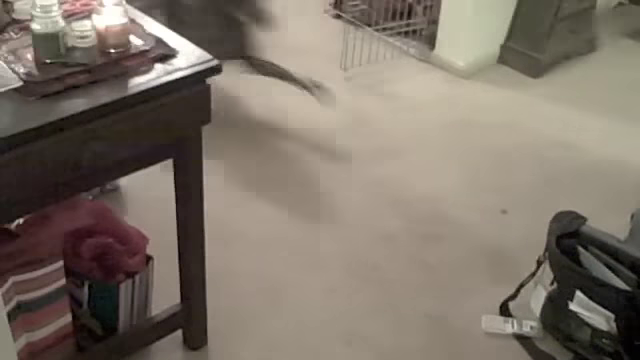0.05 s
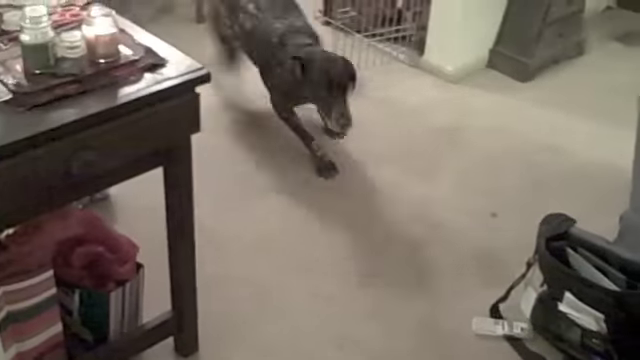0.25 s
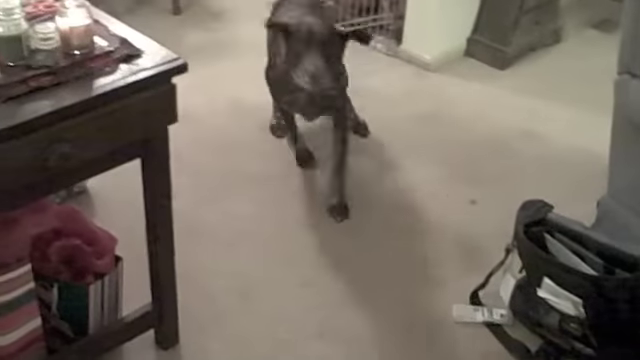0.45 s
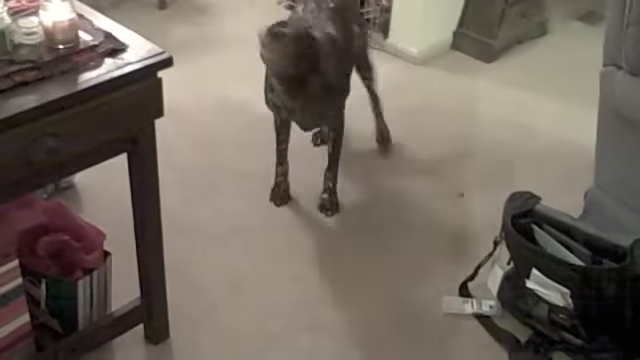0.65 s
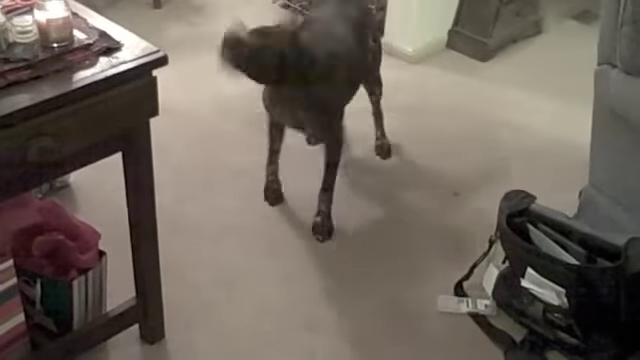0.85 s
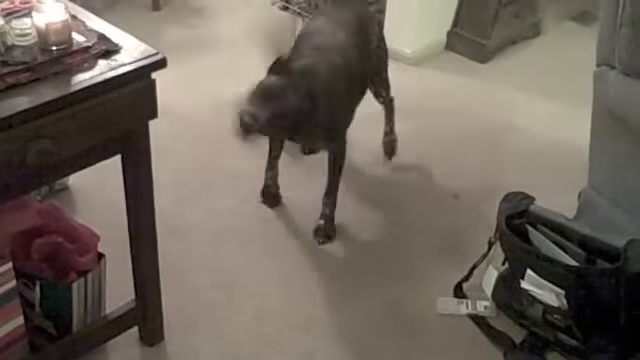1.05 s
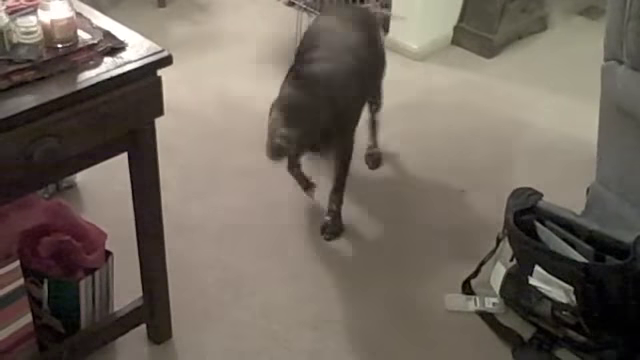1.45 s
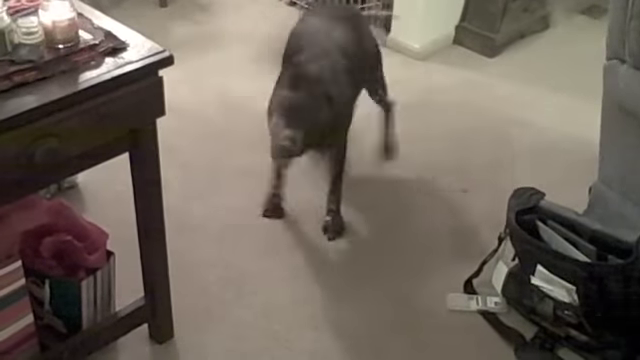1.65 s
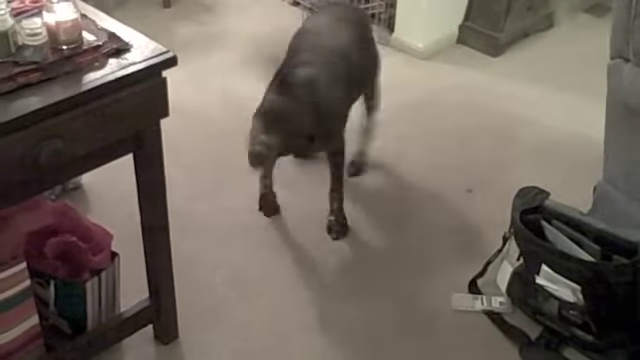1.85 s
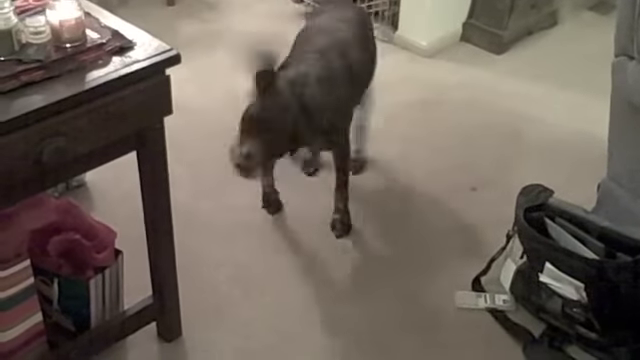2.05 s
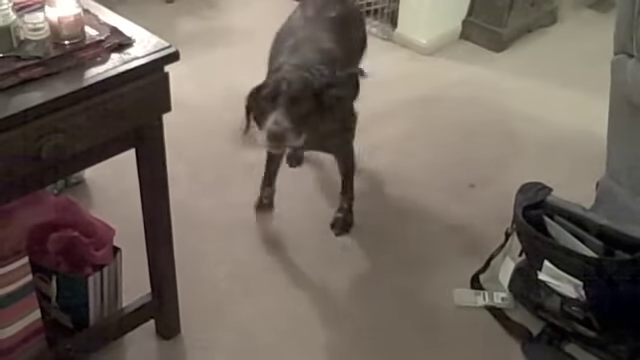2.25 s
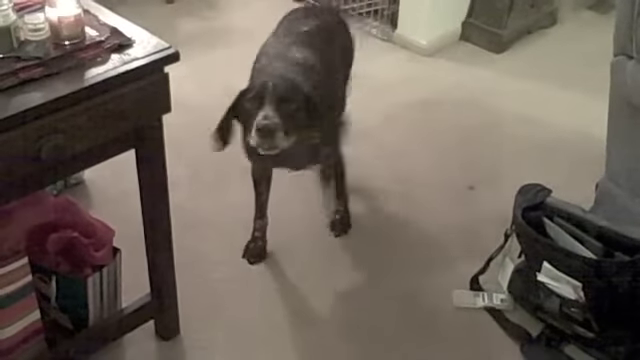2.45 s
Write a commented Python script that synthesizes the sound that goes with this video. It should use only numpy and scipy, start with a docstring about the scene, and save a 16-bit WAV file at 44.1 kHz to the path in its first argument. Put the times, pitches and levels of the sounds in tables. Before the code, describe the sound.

A dog shakes its head indoors, ears slapping rapidly, with paw thuds on carpet.

```python
"""A living room: a dog trots onto the carpet, stops close by and shakes its head.
Its ears slap about ten times a second, each slap a crack, a second contact of the tip, a patter of
skin and fur and a hollow pop of trapped air. Paws thud on the carpeted floor, claws or collar tick,
the coat rustles, and the room rings briefly over a low rumble."""
import sys
import numpy as np
from scipy import signal
from scipy.fft import rfft, irfft, next_fast_len
from scipy.io import wavfile

SR = 44100
rng = np.random.default_rng(int(sys.argv[2]) if len(sys.argv) > 2 else 0)


def wrap_up_sound(samples):
    """Save the sound to the file named by the first command line argument, as 16-bit audio."""
    columns = np.atleast_2d(samples).T
    # keep every value between -1 and 1, then stretch to whole-number steps
    tamed = np.clip(columns, -1, 1)
    steps = np.round(tamed * 32767).astype(np.int16)
    wavfile.write(sys.argv[1], SR, steps)


N = 110250


def amp(db):
    """Decibels to gain."""
    return 10 ** (np.asarray(db) / 20)


def unit(x):
    """Scales a sound to an energy of 1."""
    return x / np.sqrt(np.sum(x ** 2) + 1e-20)


def read(points, hz):
    """Reads a curve on a log-frequency axis."""
    point_hz, value = np.transpose(points)
    return np.interp(np.log(hz + 1), np.log(point_hz + 1), value)


def add(mix, start_s, sound):
    """Drops a sound into the mix."""
    part = mix[max(round(start_s * SR), 0):][:len(sound)]
    part += sound[:len(part)]


def tight_pulse(db_at, size=2048):
    """The tightest causal (minimum-phase) pulse with the given spectrum."""
    hz = abs(np.fft.fftfreq(size, 1 / SR))
    log_gain = np.log(amp(np.maximum(db_at(hz), -90)))
    spectrum = np.exp(np.conj(signal.hilbert(log_gain)))
    return unit(np.fft.ifft(spectrum).real[:size // 2])


def colour(x, eq):
    """Shapes a sound with an EQ curve."""
    return signal.fftconvolve(x, tight_pulse(lambda hz: read(eq, hz), size=4096))[:len(x)]


def grains(size, spread_db):
    """Noise made of tiny contacts of uneven strength."""
    return rng.standard_normal(size) * amp(spread_db * np.minimum(rng.exponential(1, size), 4))


def swell(t, rise_s, fall_s):
    """Exponential rise up to time zero and fall after it."""
    return np.exp(np.minimum(t / rise_s, -t / fall_s))


def bed(eq, fader, grain_db):
    """Continuous coloured noise that rides a level curve."""
    level_db = np.interp(np.arange(N) / SR, *np.transpose(fader))
    return amp(level_db) * np.sqrt(N) * unit(colour(grains(N, grain_db), eq))


def rumble():
    """The low rumble of room, floor and stirred air."""
    # Each row: frequency in Hz, level in dB.
    eq = [(15, -1), (35, 2.5), (65, 4), (100, -5.5), (200, -3.5), (300, -7), (480, -7.5), (750, -18.5),
          (1500, -22), (4000, -31), (15500, -64)]
    # Each row: time in seconds, level in dB.
    fader = [(0, -53), (.18, -53), (.27, -45), (.39, -53), (.68, -56), (.85, -51.5), (1.5, -53),
             (2.1, -52.5), (2.3, -53.5), (2.5, -54)]
    return bed(eq, fader, grain_db=-0.5)


def room(x):
    """Scatter from nearby furniture, then strong first wall echoes that sink into a dense tail."""
    # Each row: frequency in Hz, seconds for the tail to fall 60 dB.
    decay_times = [(100, 0.16), (600, 0.53), (2000, 0.53), (4500, 0.41), (9000, 0.34), (16000, 0.25)]
    # The tone of the reverb. Each row: frequency in Hz, level in dB.
    eq = [(60, -10), (300, -5.5), (900, -1.5), (2000, -5), (4200, -3), (8000, -5), (16000, -3)]
    furniture_db, early_db, wet_db = -6.5, 5, -1.5
    walls_s, early_fade_s = 0.013, 0.012
    t = np.arange(SR * 2 // 3) / SR
    echo_db = np.where(t < walls_s, furniture_db, early_db * np.exp((walls_s - t) / early_fade_s))
    echoes = grains(len(t), spread_db=4) * amp(echo_db) * (t > 0.001)
    hz, age_s, bands = signal.stft(echoes, SR, nperseg=256)
    decay = amp(-60 * age_s / read(decay_times, hz)[:, None])
    tail = unit(signal.istft(bands * decay, SR, nperseg=256)[1])
    size = next_fast_len(N + len(tail))
    gain = amp(wet_db + read(eq, np.fft.rfftfreq(size, 1 / SR)))
    return irfft(rfft(x, size) * rfft(tail, size) * gain, size)[:N]


def moving_room(x, count=7, crossfade_s=0.005):
    """A fast-moving source meets a different set of echoes every few milliseconds."""
    place = np.arange(N) / SR / crossfade_s
    distances = [abs((place - k) % count - count / 2) for k in range(count)]
    return sum(room(x * np.cos(np.pi / 2 * np.minimum(away, 1))) for away in distances)


def coat_rustle():
    """The grainy rustle of the coat and of paws brushing the carpet."""
    # Each row: frequency in Hz, level in dB.
    eq = [(200, -14), (700, -2.5), (2000, -4), (4000, -2.5), (7500, 1.5), (11000, -4), (15500, -4)]
    # Each row: time in seconds, level in dB.
    fader = [(0, -65), (.115, -71.5), (.135, -61.5), (.19, -67.5), (.26, -55.5), (.41, -67.5),
             (0.461, -63.5), (.55, -58.5), (.7, -69.5), (1.0, -67), (1.6, -58.5), (2.15, -70), (2.3, -67),
             (2.431, -67.5), (2.5, -58.5)]
    return bed(eq, fader, grain_db=5.0)


def crack(centre_hz, slope_db, low_share=0.41):
    """A pressure snap that falls slope_db per octave above its centre, low_share of that below."""
    knee_octaves, low_cut_hz = 0.085, 446

    def shape(hz):
        octaves = np.log2((hz + 1) / centre_hz)
        bend = np.hypot(octaves, knee_octaves) - knee_octaves
        slope = slope_db * np.where(octaves < 0, low_share, 1)
        return -slope * bend - 10 * np.log10(1 + (low_cut_hz / (hz + 1)) ** 4)
    return tight_pulse(shape)


def ticks():
    """Small bright clicks of claws or collar."""
    # Each row: start in seconds, level in dB, centre in Hz.
    clicks = [(.097, -40, 9000), (0.2539, -17, 10400), (0.447, -34, 10500), (.603, -38, 7750),
              (1.055, -26, 9000), (1.259, -31, 9640), (1.419, -26.5, 9500), (1.653, -37, 9500),
              (1.8011, -16, 3150)]
    out = np.zeros(N)
    for start_s, db, hz in clicks:
        add(out, start_s, amp(db) * crack(hz, slope_db=8, low_share=0.76))
    return out


def paws():
    """Each paw knocks and scuffs on the carpet, then the weight sets the floor ringing."""
    # Each row: start in seconds, thump, knock and pad levels in dB, pad decay in seconds.
    steps = [(0.2059, -3, -7.5, -9, 0.071), (0.316, -19, -21.5, -26.5, .03),
             (0.451, -18, -37, -24.5, 0.033), (.557, -13, -33, -25, 0.024), (.742, -17, -24.5, -30, 0.044),
             (.945, -19.5, -23.5, -22, 0.048), (1.672, -28, -27, -15.5, 0.033),
             (1.803, -9.5, -16.5, -17.5, 0.022), (2.104, -11.5, -9.5, -11, 0.031),
             (2.150, -13, -21, -15.5, 0.037)]
    # The floor's deep thump. Each row: pitch in Hz, level in dB, seconds to fall 60 dB.
    floor_modes = [(65.5, 2.5, 0.13), (126, -4, 0.14), (209.6, -12, 0.17)]
    # The higher knock of the landing, with the same columns.
    knock_modes = [(137.5, 0.5, 0.19), (207, 2.5, 0.082), (315, -2.5, 0.062), (390.6, -3, 0.15),
                   (529, -3.5, 0.055), (796, -11.5, 0.044), (1394, -11.5, .04)]
    # The pad's dull scuff. Each row: frequency in Hz, level in dB.
    pad_eq = [(25, 12), (70, -6), (150, 1), (260, 0.5), (420, -6), (650, -10.5), (1400, -18), (3000, -28.5),
              (15000, -45)]
    weight_s, touch_s = 0.021, 0.0015  # the leg takes the weight more slowly than the pad touches
    out, t = np.zeros(N), np.arange(SR // 2) / SR

    def ring(modes):
        return sum(amp(db - 60 * t / t60) * np.sin(2 * np.pi * hz * t) * (-1) ** k
                   for k, (hz, db, t60) in enumerate(modes))
    thump = unit(ring(floor_modes) * np.minimum(t / weight_s, 1) ** 2)
    touch = np.minimum(t / touch_s, 1)
    knock = unit(ring(knock_modes) * touch)
    for start_s, thump_db, knock_db, pad_db, decay_s in steps:
        pad = unit(colour(rng.standard_normal(len(t)) * touch * np.exp(-t / decay_s), pad_eq))
        add(out, start_s, amp(thump_db) * thump + amp(knock_db) * knock + amp(pad_db) * pad)
    return out


def smack(centre_hz, slope_db):
    """A smeared crack: the rest of a soft flap lands just after its first point."""
    smear_s, smear_db = 0.00057, -9.5
    t = np.arange(256) / SR
    smear = unit(rng.standard_normal(len(t)) * t * np.exp(-t / smear_s))
    landing = (t == 0) + amp(smear_db) * smear
    return unit(np.convolve(crack(centre_hz, slope_db), landing))


def ears():
    """Each ear lands with a crack, then its tip; skin patters and trapped air pops."""
    # Each row: time in seconds; crack level in dB, centre in Hz and slope in dB per octave;
    # tip delay in seconds, level in dB and centre in Hz; patter level and treble gain in dB;
    # pop level in dB and centre in Hz.
    slaps = [(0.7746, -24, 1620, 5, .0054, -18, 2170, -19.5, -5, -17, 680),
             (.8657, -4, 5070, 19.5, .0016, -11, 1940, -12, 1, -13, 715),
             (0.9472, -16, 3520, 61, .0152, -19, 3240, -19, 8, -20.5, 590),
             (.9736, -9.5, 10600, 3.5, .0030, -21, 1980, -16.5, 5.5, -11.5, 657),
             (1.078, -3.5, 5650, 12.5, 0.0051, -8, 4440, -15, 8.5, -16, 560),
             (1.1764, -8.5, 2040, 11, .0053, -12, 2370, -11, 2.5, -16.5, 650),
             (1.2840, -16.5, 2300, 6.5, 0.0035, -12.5, 2180, -11.5, 0, -14, 717),
             (1.3843, -20, 1570, 6, .0065, -19.5, 2060, -11.5, -10, -21.5, 720),
             (1.4834, -17, 2090, 16, .0082, -30, 7000, -10, -0.5, -21.5, 620),
             (1.5830, -25, 1700, 18, .0085, -20.5, 5050, -14, 3.5, -28.5, 640),
             (1.68, -19.5, 2420, 10.5, .0021, -18.5, 3000, -15.5, 4, -24.5, 546),
             (1.783, -19.5, 2040, 11, .0038, -17.5, 4200, -15.5, 5, -19.5, 660),
             (1.8797, -8.5, 2360, 35, .0016, -19, 2500, -12, 3, -15.5, 746),
             (1.98, -30, 2000, 17, .0070, -25, 5160, -26.5, 12.5, -20, 760),
             (2.0743, -17.5, 4900, 23, .0081, -15.5, 6850, -12, 2, -22, 574),
             (2.1778, -20, 2320, 13, 0.0075, -20.5, 4860, -19, 2, -18.5, 740)]
    # The tone of skin and fur. Each row: frequency in Hz, level in dB.
    patter_eq = [(150, -18), (400, -6), (1000, -3), (1600, 2), (2400, -0.5), (3800, -7), (6500, -10.5),
                 (10000, -14), (15500, -14.5)]
    out, t = np.zeros(N), np.arange(-0.06, 0.1, 1 / SR)  # the ear lands at t = 0
    skin_envelope = swell(t - 0.001, rise_s=0.0036, fall_s=0.005)
    fur_envelope = amp(-12) * swell(t - 0.0083, rise_s=0.007, fall_s=0.007)
    pop_envelope = swell(t - 0.00044, rise_s=0.0019, fall_s=0.0062)
    highpass = signal.butter(1, 4000, "high", fs=SR, output="sos")
    for at_s, crack_db, hz, slope_db, tip_s, tip_db, tip_hz, patter_db, shelf_db, pop_db, pop_hz in slaps:
        add(out, at_s, amp(crack_db) * smack(hz, slope_db))
        add(out, at_s + tip_s, amp(tip_db) * smack(tip_hz, slope_db))
        contacts = grains(len(t), spread_db=7) * (skin_envelope + fur_envelope)
        patter = unit(colour(contacts, patter_eq))
        treble = signal.sosfilt(highpass, patter)
        add(out, at_s + t[0], amp(patter_db) * (patter + (amp(shelf_db) - 1) * treble))
        puff = rng.standard_normal(len(t)) * pop_envelope
        pop = unit(signal.fftconvolve(puff, crack(pop_hz, slope_db=24, low_share=0.77)))
        add(out, at_s + t[0], amp(pop_db) * pop)
    return out


def scene():
    """Head shake and paws in the room, over coat rustle and rumble, in mono."""
    head, feet = ears() + ticks(), paws()
    echoes = moving_room(head) + amp(3) * room(feet)  # paws excite the room more than the head does
    return (head + feet + echoes + coat_rustle() + rumble())[None]


def record(dry):
    """A steep low-pass trims the very top of the treble."""
    lowpass = signal.firwin(401, 15950, window=("kaiser", 8), fs=SR)
    return signal.oaconvolve(dry, lowpass[None], "same")


dry = scene()
out = record(dry)
wrap_up_sound(out)
```